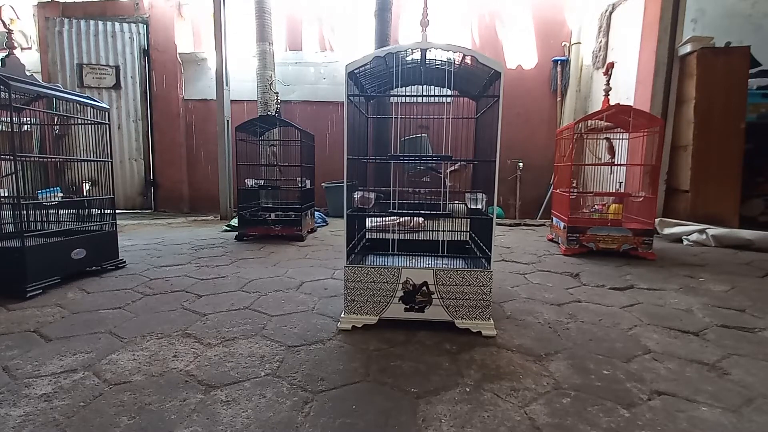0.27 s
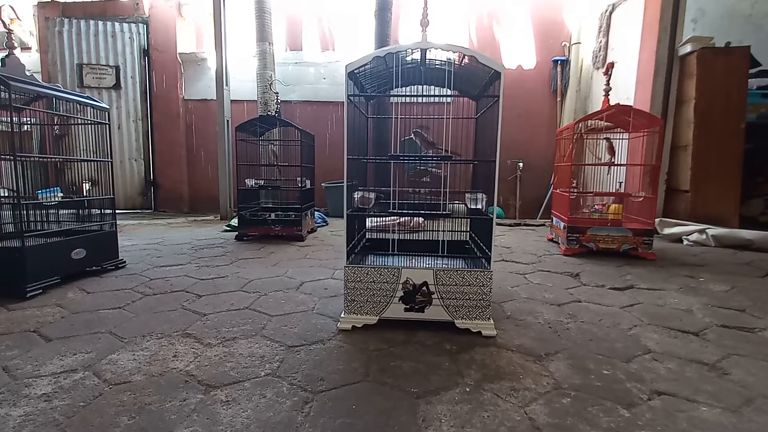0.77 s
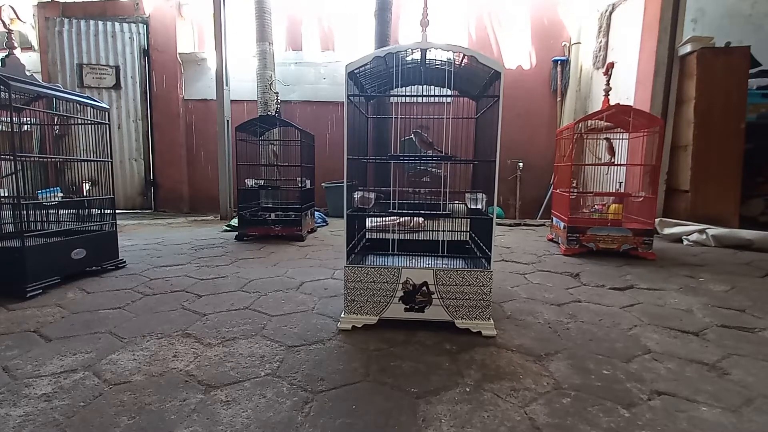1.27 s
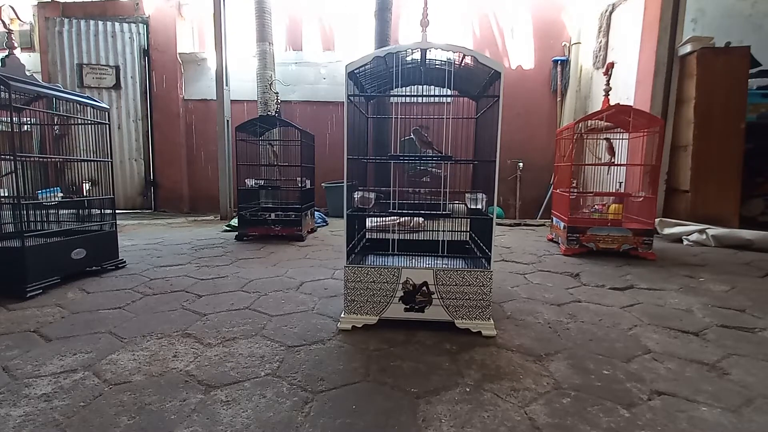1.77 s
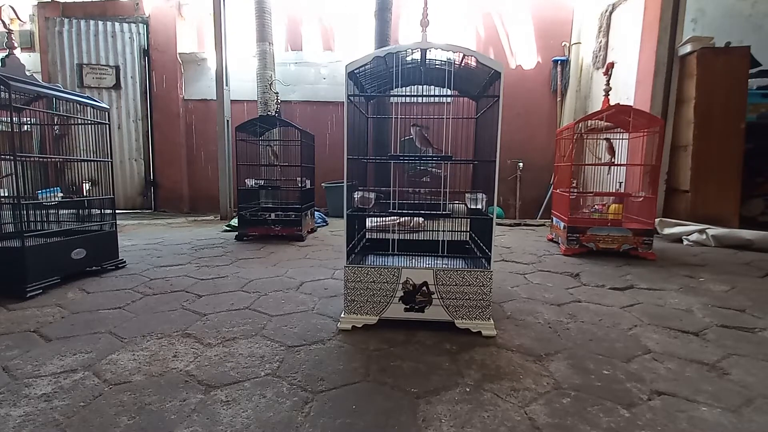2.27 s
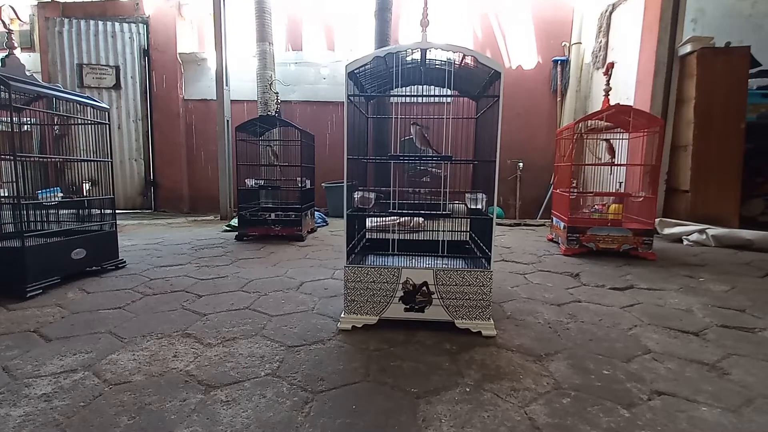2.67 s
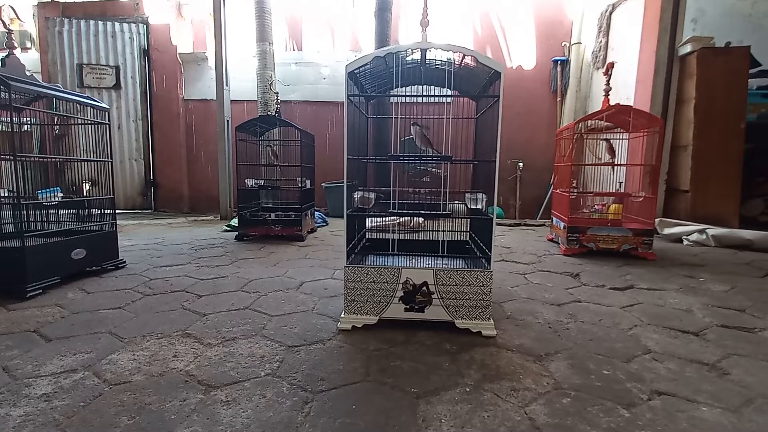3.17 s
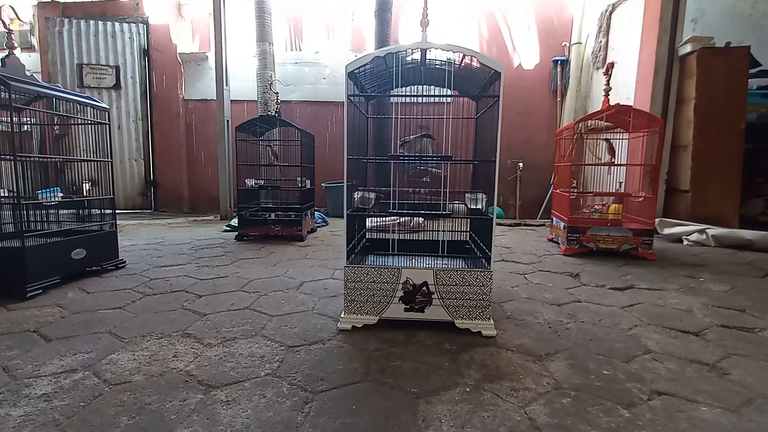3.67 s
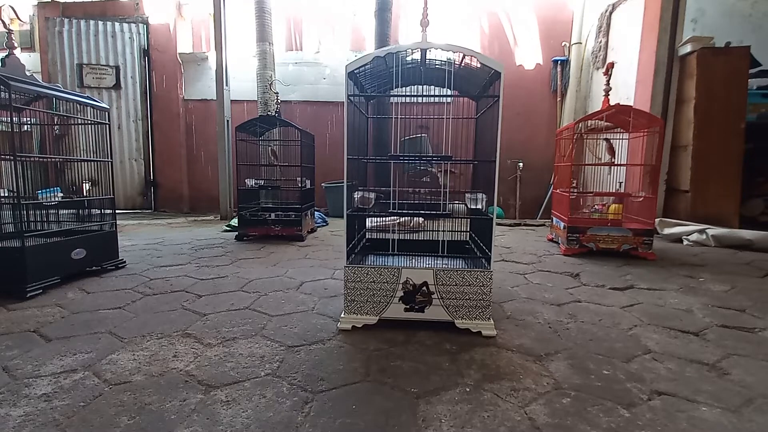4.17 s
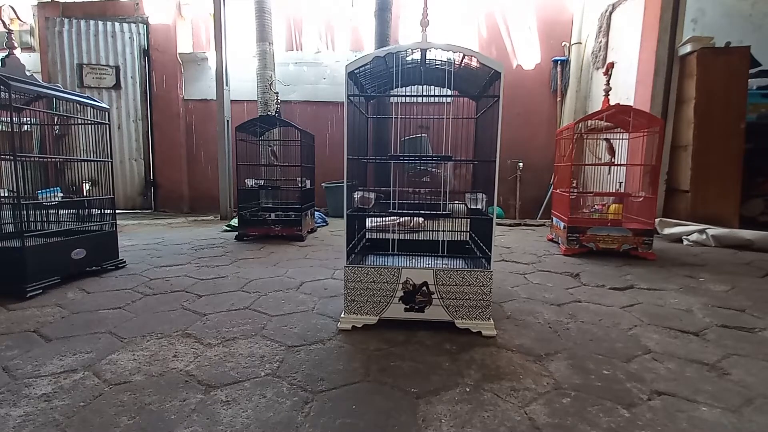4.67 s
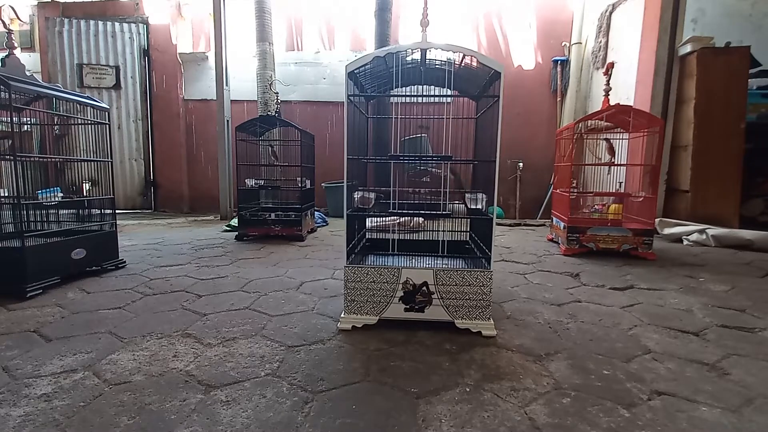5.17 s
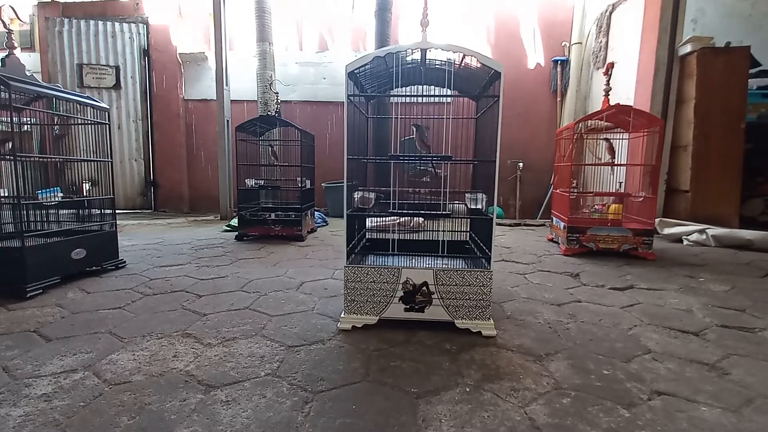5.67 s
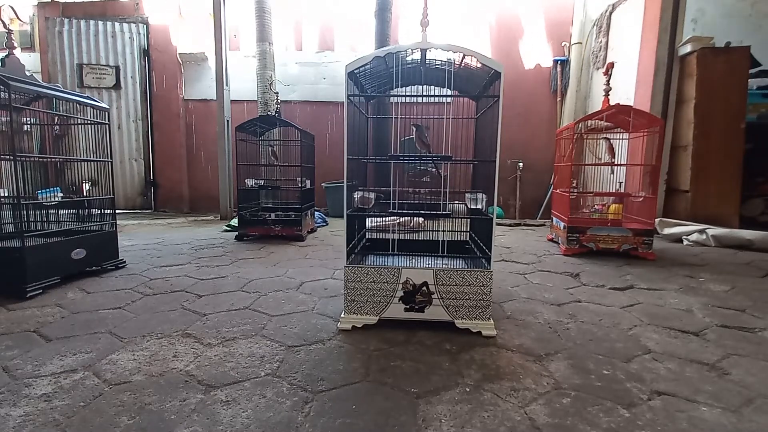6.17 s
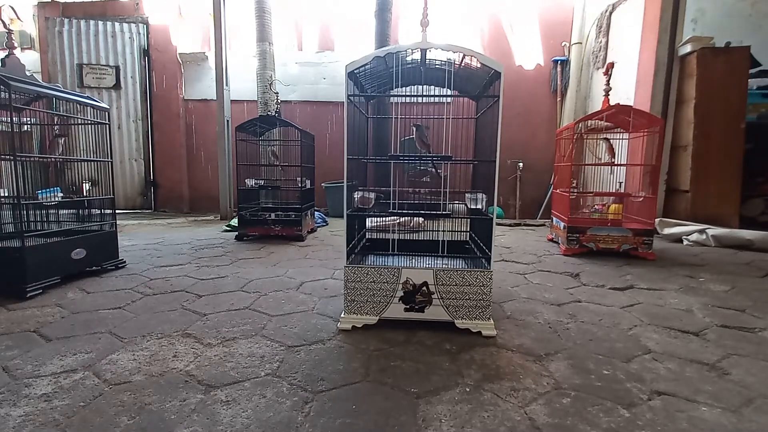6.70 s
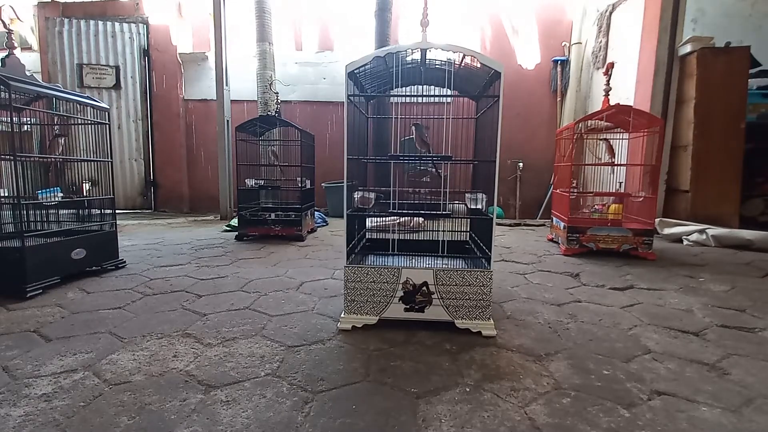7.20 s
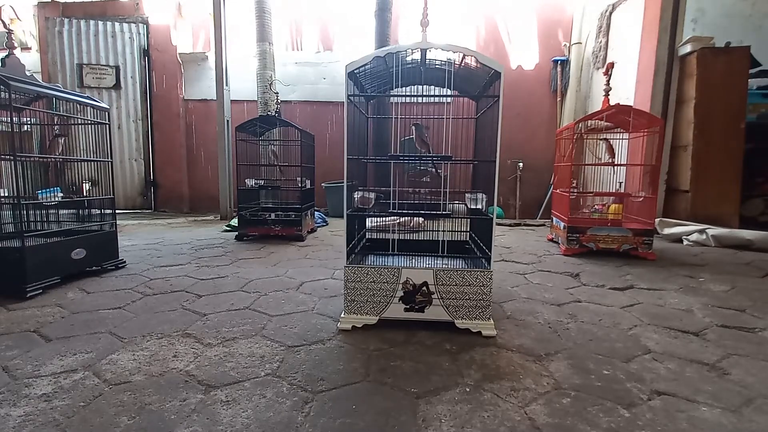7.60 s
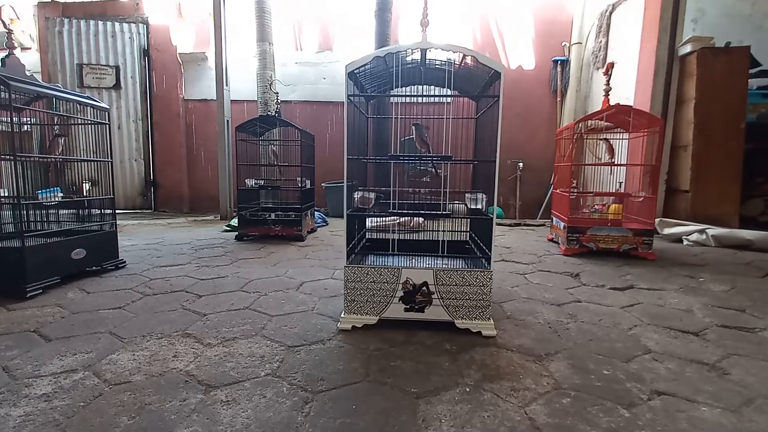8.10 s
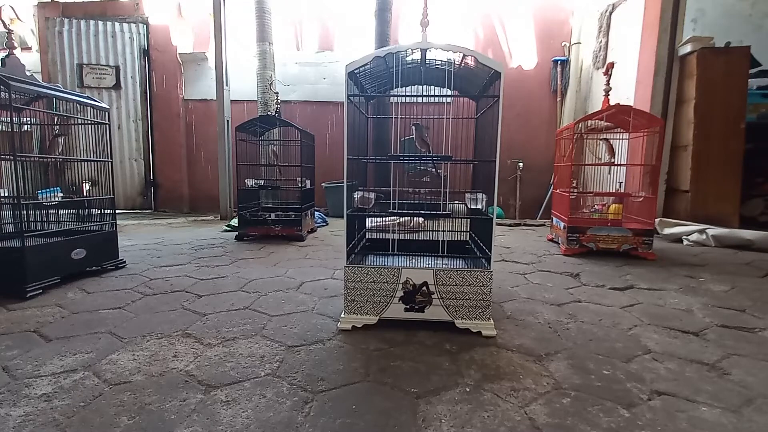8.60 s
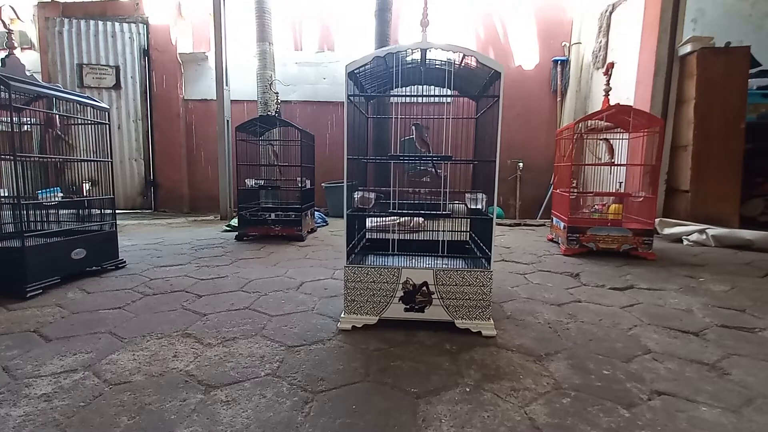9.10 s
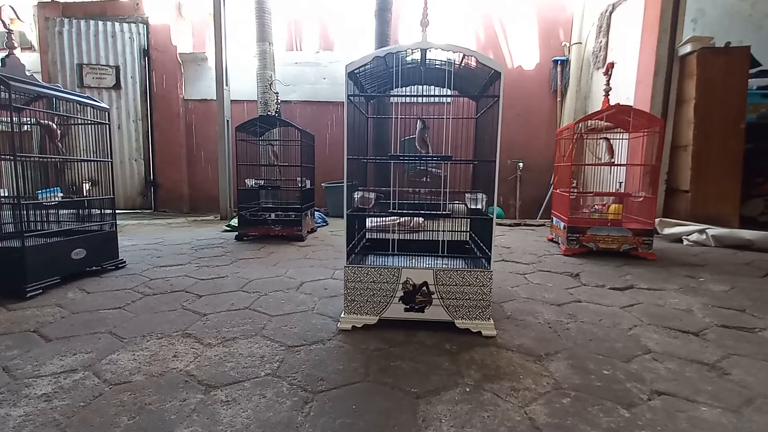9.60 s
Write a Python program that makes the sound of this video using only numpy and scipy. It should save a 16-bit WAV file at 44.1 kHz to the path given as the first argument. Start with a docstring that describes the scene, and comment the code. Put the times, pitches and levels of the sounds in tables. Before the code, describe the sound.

In a hard-walled paved yard, a caged shrike mixes thin pips, paired harsh chacks, rising nasal whines and clear whistles. A second bird repeats quick falling slurs at the beginning and again near the end. Soft bass puffs hit the microphone early, light cage scuffs come midway, and a distant engine hum grows from about six seconds.

```python
"""A hard-walled, paved yard with caged songbirds, heard at two microphone ports over a murmur of distant streets.
A shrike runs through thin pips, reedy chips, churrs, harsh chacks, nasal whines and whistles, each a sum of
partials along a pitch curve; a second bird, at another spot, repeats a falling slur made the same way.
Short noise bursts rattle a cage, bass noise puffs at the ports, and far off an engine swells: firing orders
over a noise roar. Wall echoes and a decaying tail surround the birds and the cage."""
import sys
import numpy as np
from scipy import signal
from scipy.fft import rfft, irfft, next_fast_len
from scipy.io import wavfile
from scipy.ndimage import map_coordinates

SR = 44100
rng = np.random.default_rng(int(sys.argv[2]) if len(sys.argv) > 2 else 0)


def wrap_up_sound(samples):
    """Save the sound to the file named by the first command line argument, as 16-bit audio."""
    columns = np.atleast_2d(samples).T
    # keep every value between -1 and 1, then stretch to whole-number steps
    tamed = np.clip(columns, -1, 1)
    steps = np.round(tamed * 32767).astype(np.int16)
    wavfile.write(sys.argv[1], SR, steps)


N = 434385  # length in samples


def amp(db):
    """Amplitude factor of a level in dB."""
    return 10 ** (np.asarray(db) / 20)


def unit(x):
    """Scale to an rms of 1."""
    return x / np.sqrt(np.mean(x ** 2) + 1e-20)


def along(points, hz):
    """Read (f/Hz, value) points on a log frequency axis."""
    f, v = np.transpose(points)
    return np.interp(np.log(hz + 1), np.log(f + 1), v)


def curves(rows):
    """One value per sample for each column after the time."""
    s, *columns = np.transpose(rows)
    return [np.interp(np.arange(N) / SR, s, column) for column in columns]


def wobble(rate, size=N):
    """A smooth random curve with rate knots a second."""
    knots = rng.standard_normal(int(size * rate / SR) + 4)
    return map_coordinates(knots, [np.arange(size) * rate / SR])


def filtered(x, response):
    """Shape x by a complex response of frequency."""
    m = next_fast_len(N + 8192)
    return irfft(rfft(x, m) * response(np.fft.rfftfreq(m, 1 / SR)), m)[..., :N]


def add(track, s, sound):
    """Mix a sound into a track from time s on, cut at the track's ends."""
    start = round(s * SR)
    part = sound[..., max(-start, 0):max(N - start, 0)]
    track[..., max(start, 0):max(start, 0) + part.shape[-1]] += part


def steps(length, count=80):
    """Even moments through a note, in s after its start."""
    return np.linspace(0, length, count)


def noise(spectrum):
    """Two unrelated coloured noises with a joint rms of 1."""
    return unit(filtered(rng.standard_normal((2, N)), lambda hz: amp(along(spectrum, hz))))


# likeness of all-round noise at the two microphone ports: f/Hz, left-right correlation [0-1]
PORT_LIKENESS = [(50, 0.7), (130, 0.98), (300, 0.67), (600, 0.35), (1500, 0.13)]


def diffuse(spectrum):
    """Noise from all around: mostly alike at both ports in the bass, hardly alike in the treble."""
    def turn(hz):
        return np.arccos(np.clip(along(PORT_LIKENESS, hz), -1, 1)) / 2

    mid, side = filtered(noise(spectrum), lambda hz: np.array([np.cos(turn(hz)), np.sin(turn(hz))]))
    return unit(np.array([mid + side, mid - side]))


# where the treble control of the beak begins, and the span over which it sets in
TREBLE_HZ, TREBLE_WIDTH_HZ = 4000, 470


def add_note(track, rows, partials, rough, flutter_db, throat=None, treble_db=0):
    """One syrinx note along (t/s, f/Hz, level/dB) rows; rough shakes pitch, flutter level, treble_db the beak."""
    s, hz, db = np.transpose(rows)
    t = np.arange(s[0], s[-1], 1 / SR)
    pitch = np.abs(np.interp(t, s, hz) * (1 + rough * wobble(900, size=len(t))))
    phase = 2 * np.pi * np.cumsum(pitch) / SR
    effort_db = np.interp(t, s, db)
    beak_db = np.interp(t, s, treble_db + np.zeros(len(s)))
    tone = 0
    for k, level in partials:
        if throat:
            # high overtones waver, and fade first when the effort drops
            high = np.clip(np.log2(k * pitch / 3800), 0, 1)
            waver_db = .35 * (effort_db - max(db)) + 3 * wobble(45, size=len(t))
            level = level + along(throat, k * pitch) + high * waver_db
        treble = np.clip((k * pitch - TREBLE_HZ) / TREBLE_WIDTH_HZ, 0, 1)
        audible = k * pitch < SR / 2  # no aliasing
        tone = tone + amp(level + treble * beak_db) * audible * np.sin(k * phase)
    edges = np.clip(np.minimum(t - s[0], s[-1] - t) / .004, 0, 1)  # 4 ms ramps
    level_db = effort_db + flutter_db * wobble(346.3, size=len(t))
    add(track, s[0], tone * edges * amp(level_db))


def harmonics(count):
    """An even stack of partials, to be shaped by the throat."""
    return [(k + 1, 0) for k in range(count)]


# the hard walls: f/Hz, time to decay by 60 dB t/s
WALLS = [(300, 0.067), (2000, 0.59), (4000, 0.66), (6000, 0.6), (9000, 0.66), (14000, 0.25)]


def in_yard(x, lag_ms, pan_db, direct_db, wet_db, early_db):
    """Direct sound at two ports, 8 wall echoes a port and the yard's dense tail; lag delays left, pan favours it."""
    direct = filtered(x, lambda hz: np.exp(np.pi * 1j * np.outer([-1, 1], hz) * lag_ms / 1000))
    direct_gain = amp(direct_db + np.array([[pan_db], [-pan_db]]) / 2)
    # tail: noise that decays at its own rate in each band
    hz, t, z = signal.stft(rng.standard_normal((2, SR)), SR, nperseg=256)
    decay = amp(-60 * t / along(WALLS, hz)[:, None]) * (1 - np.exp(-t / 0.0014))
    tail = signal.istft(z * decay, SR, nperseg=256)[1]
    tail *= amp(wet_db) / np.linalg.norm(tail[0])
    for port in tail:
        echoes = (rng.uniform(.004, .035, size=8) * SR).astype(int)
        port[echoes] += amp(early_db) * rng.choice([-1, 1], size=8)
    return direct * direct_gain + signal.fftconvolve(x[None], tail, axes=1)[:, :N]


# background of the yard over time: t/s, level/dB
YARD_LEVEL = [(0, -65.5), (2.6, -71), (3.3, -68), (4.8, -63.5), (5.6, -67), (6.2, -64.5)]
# colour of the background: f/Hz, relative level/dB
STREET_COLOUR = [(25, -33), (60, -4), (110, 1.5), (180, -2.5), (300, -12), (600, -19), (1200, -27.5),
                 (4000, -23), (10000, -43), (15000, -24)]


def background():
    """The low murmur of distant streets: coloured noise from all around."""
    level_db, = curves(YARD_LEVEL)
    return amp(level_db) * diffuse(STREET_COLOUR)


# loudness of the far engine before its arrival fade: t/s, relative level/dB
ENGINE_LEVEL = [(6.3, -91), (6.48, -56), (6.96, -55), (7.22, -59), (7.76, -50), (7.82, -55), (8.08, -48.5),
                (8.17, -52), (8.35, -42.5), (8.75, -50), (9.85, -53.5)]
# firing orders: multiple of the firing rate, relative level/dB
EXHAUST_ORDERS = [(0.997, -18), (1.5, -19), (2, -2.5), (2.5, -6.5), (3, 0.5), (3.5, -20), (4, -8.5),
                  (6, -13.5), (7.5, -19.5), (8.25, -21)]
# colour of the exhaust roar: f/Hz, relative level/dB
ROAR_COLOUR = [(25, -80), (45, -11), (120, 0), (180, -5), (270, -14.5), (400, -18), (700, -26.5),
               (1200, -31), (2500, -26), (6000, -120)]
# gear tones that join under load: f/Hz, mean level/dB
GEAR_TONES = [(46, -54), (338, -65), (758, -67)]
ENGINE_HZ, ENGINE_DRIFT = 39.93, 0.0074  # firing rate, and the share by which it wanders
# when it comes into earshot and when it takes load, each with its rise time
ARRIVES_S, ARRIVAL_S, PULLS_S, PULL_RISE_S = 6.1, 1, 9.1, 0.14
THROB_DB, ROAR_DB, ROAR_GROWS_DB_PER_S = -0.5, -10, 3.5  # roar level as it arrives


def engine():
    """A far engine: unsteady firing orders over a dull exhaust roar that grows; gear tones join as it pulls."""
    loud_db, = curves(ENGINE_LEVEL)
    t = np.arange(N) / SR
    phase = 2 * np.pi * np.cumsum(ENGINE_HZ * (1 + ENGINE_DRIFT * wobble(9.5))) / SR
    throb = np.zeros(N)
    for k, db in EXHAUST_ORDERS:
        throb += amp(db + 2.5 * wobble(4)) * np.sin(k * phase + .4 * wobble(5))
    gears = np.zeros(N)
    for hz, db in GEAR_TONES:
        shake = hz / 380 * (wobble(14) + .6 * wobble(70))  # radians
        gears += amp(db + 3 * wobble(9)) * np.sin(2 * np.pi * hz * t + shake)
    roar = amp(ROAR_DB + ROAR_GROWS_DB_PER_S * (t - ARRIVES_S)) * diffuse(ROAR_COLOUR)
    arrival = np.clip((t - ARRIVES_S) / ARRIVAL_S, 0, 1)
    load = np.clip((t - PULLS_S) / PULL_RISE_S, 0, 1)
    return arrival * amp(loud_db) * (amp(THROB_DB) * unit(throb) + roar) + load * gears


# puffs of air at the microphone: t/s, length t/s, left port level/dB, right port level/dB
AIR_PUFFS = [(0.026, 0.12, -49, -52), (0.114, 0.21, -56, -46), (0.542, 0.12, -70, -46.5),
             (0.662, 0.16, -62, -50), (0.77, 0.21, -61, -42.5), (1.279, 0.082, -43.5, -75),
             (1.585, 0.14, -48.5, -72), (1.829, 0.046, -34, -62), (1.845, 0.16, -34.5, -72),
             (2.02, 0.16, -54, -50.5)]
# colour of the buffeting: f/Hz, relative level/dB
BUFFET_COLOUR = [(20, -33), (40, -11), (75, -2.5), (130, -17.5), (280, -35), (600, -63.5)]


def puffs():
    """Each eddy pushes on the two ports with its own strength: swelling and fading bass noise."""
    strength = np.zeros((2, N))
    for s, length, left_db, right_db in AIR_PUFFS:
        add(strength, s, amp([[left_db], [right_db]]) * np.hanning(int(length * SR)))
    return strength * noise(BUFFET_COLOUR)


# cage taps, and a sharp bill snap at 6.215 s: t/s, relative level/dB, share of bright noise against frame [0-1]
CAGE_TAPS = [(4.423, -48.5, 0.21), (4.488, -57.5, 0.14), (4.663, -54, 0.2), (4.788, -55.5, 0.21),
             (5.243, -61, .1), (6.215, -61, 0.96)]
# colour of the wooden frame: f/Hz, relative level/dB
FRAME_COLOUR = [(100, 5), (300, -0.5), (800, -7), (1600, -6), (4000, 10), (15000, -37)]
# colour of claws on wire and of a snapping bill: f/Hz, relative level/dB
WIRE_COLOUR = [(2000, -40), (5000, -9), (9000, -15), (13000, 1), (15500, -7)]


def cage():
    """Light scuffs of feet: a knock in the frame and a scratch on the wires; one bright burst is a bill snap.
    All are decaying noise."""
    frame, wire, t = np.zeros(N), np.zeros(N), np.arange(SR // 4) / SR
    for s, db, bright in CAGE_TAPS:
        decay_db = db - 60 * t / .13  # 60 dB down in 0.13 s
        scuff = amp(decay_db + 3 * wobble(300, size=len(t))) * (1 - np.exp(-t / .005))
        add(frame, s, scuff * (1 - bright))
        add(wire, s, scuff * bright)
    return amp(11.5) * (frame * noise(FRAME_COLOUR)[0] + wire * noise(WIRE_COLOUR)[0])


# falling slurs: t/s, length t/s, end f/Hz, bend [1 dives straight, 2 levels off],
# relative level/dB, fade by the end level/dB
FALLING_SLURS = [(.415, 0.17, 2654, 2.65, -34, 6), (.68, 0.18, 2743, 2.6, -31.5, 10.4),
                 (.949, 0.21, 2683, 2.58, -30, 18.4), (1.226, .16, 1690, 0.92, -29.5, 16.4),
                 (1.473, 0.15, 1688, 0.92, -30.5, 13.9), (1.736, 0.15, 1828, 0.99, -31, 12.7),
                 (1.995, .15, 1854, 0.98, -31.5, 13.8), (7.343, 0.18, 2754, 2.4, -36, 4.7),
                 (7.616, .19, 2717, 2.3, -31.5, 10.6), (7.905, 0.18, 1940, 1.1, -30, 19.3),
                 (8.177, 0.17, 1800, 0.98, -30, 14.8), (8.436, .15, 1930, 1.03, -26.5, 20.4),
                 (8.695, 0.16, 1720, 0.89, -29, 16.8), (8.949, 0.15, 1795, 0.83, -31, 13)]
# the slurring bird's beak: f/Hz, gain level/dB
SLUR_BEAK = [(1800, 0), (2700, 1.5), (3800, 6), (4800, 10.5), (6000, -7), (7500, 5), (9500, -17),
             (12000, 6), (14500, -13)]
# shared start; opening deficit and its time constant; share of the length before the fade
SLUR_START_HZ, SLUR_OPENING_DB, SLUR_ATTACK_S, SLUR_HOLD = 4550, 21.5, 0.02, 0.14


def slurring_bird():
    """Nearly pure glides that start alike, then level off and hold, or dive and fade."""
    song = np.zeros(N)
    for s, length, end_hz, bend, db, fade_db in FALLING_SLURS:
        t = steps(length)
        u = t / length
        hz = end_hz + (SLUR_START_HZ - end_hz) * np.abs(1 - u) ** bend
        opening_db = SLUR_OPENING_DB * np.exp(-t / SLUR_ATTACK_S)
        closing_db = fade_db * np.interp(u, [SLUR_HOLD, 1], [0, 1]) ** 1.03
        rows = np.transpose([s + t, hz, db - opening_db - closing_db])
        partials = [(1, .5), (2, -21.5), (3, -23)]  # multiple, level/dB
        add_note(song, rows, partials, rough=0.0049, flutter_db=1.5, throat=SLUR_BEAK)
    return song


STEADY_DB = .9  # level flutter of whines and whistles
# short clear whistles: t/s, length t/s, reference f/Hz, opening arch f/Hz, relative level/dB
CLEAR_WHISTLES = [(3.46, 0.15, 4406, 877, -29.5), (5.4, 0.032, 2837, 8, -35),
                  (7.691, 0.14, 4385, 780.5, -29), (9.474, 0.046, 4950, 178, -32.5),
                  (9.76, .04, 4300, 35, -36), (9.818, .07, 4750, 5, -24)]
# partials of a whistle: multiple of the reference, relative level/dB
FLUTY_PARTIALS = [(2 / 3, -17), (0.97, 0), (4 / 3, -30), (5 / 3, -20.5), (2, -34.5), (8 / 3, -26)]
WHISTLE_TREMOR = .004  # share of the pitch
ARCH_PEAK_S, ARCH_WIDTH_S = 0.032, .033  # when the arch tops out, and how fast it settles
WHISTLE_SCOOP, WHISTLE_SCOOP_S = 0.089, 0.00527  # starts flat by this share; recovery time constant
WHISTLE_ATTACK_S, WHISTLE_RELEASE_S, WHISTLE_FADE_DB = 0.024, 0.013, 12


def whistles():
    """A short, nearly pure note scoops in, may arch above its pitch, then settles."""
    song = np.zeros(N)
    for s, length, held_hz, arch_hz, db in CLEAR_WHISTLES:
        t = steps(length)
        scoop = 1 - WHISTLE_SCOOP * np.exp(-t / WHISTLE_SCOOP_S)
        hz = held_hz * scoop + arch_hz * np.exp(-((t - ARCH_PEAK_S) / ARCH_WIDTH_S) ** 2)
        opening = np.clip(np.minimum(t / WHISTLE_ATTACK_S, (length - t) / WHISTLE_RELEASE_S), 0, 1)
        rows = np.transpose([s + t, hz, db - WHISTLE_FADE_DB * (1 - opening)])
        add_note(song, rows, FLUTY_PARTIALS, WHISTLE_TREMOR, STEADY_DB)
    return song


# rising nasal whines: t/s, length t/s, opening f/Hz, top f/Hz, share of the climb at an even pace,
# lateness of the rest, relative level/dB, gain by the end level/dB, depth of the swells, treble level/dB
NASAL_WHINES = [(3.114, 0.36, 1485, 2416, 0.072, 2.02, -29, -2.5, 0.98, 1),
                (4.569, 0.089, 1493, 1790, 0.45, 1.4, -52, 7.5, 0.18, 0),
                (5.276, 0.16, 1606, 2009, 0.38, 0.87, -42.5, 1.5, 0.1, -2),
                (6.839, .365, 1424, 2417, 0.43, 2.7, -33.5, -4, 1, -2),
                (8.272, .33, 1439, 2435, 0.22, 2.6, -35, -9, 0.61, 4.5),
                (9.25, 0.34, 1459, 2385, 0.46, 3.2, -33, 1, 0.75, 0)]
# swells and beak through a whine, before depth: share of its length, effort level/dB, treble level/dB
WHINE_COURSE = [(0, -11.5, 10.5), (.06, -7, 10), (.13, -2, 2), (.23, -2, -19), (.42, -9.5, -14.5),
                (.6, -1, -18), (.78, 2.5, 1), (.92, -0.5, -11.5), (1.002, 5.5, -12)]
# the throat's resonances: f/Hz, gain level/dB
NASAL_THROAT = [(1300, -16), (1950, -16), (2400, 2), (3000, 4), (3600, -3), (4300, 4), (4800, -1),
                (6300, -13.5), (7400, -11.5), (8200, -20), (9000, -17.5), (10300, -32), (12000, -16.5),
                (15500, -29)]
# softly sung whines turn hoarse: level/dB, roughness [share of pitch]
HOARSENESS = [(-52, .05), (-44, .028), (-36, .005), (-26, .002)]
WHINE_SCOOP, WHINE_SCOOP_S = 0.18, .013  # starts flat by this share; recovery time constant
WHINE_TOPS_OUT = .91  # share of the length at which the top is reached


def whines():
    """A nasal note scoops up to its opening pitch, creeps higher, then climbs in an S to the top and holds it."""
    song = np.zeros(N)
    share, effort_db, beak_db = np.transpose(WHINE_COURSE)
    for s, length, open_hz, top_hz, creep, late, db, gain_db, depth, bright_db in NASAL_WHINES:
        t = steps(length)
        u = t / length
        way = np.clip(u / WHINE_TOPS_OUT, 0, 1)
        climb = creep * way + (1 - creep) * np.sin(np.pi / 2 * way ** late) ** 2
        scoop = 1 - WHINE_SCOOP * np.exp(-t / WHINE_SCOOP_S)
        hz = open_hz * scoop + (top_hz - open_hz) * climb
        level_db = db + gain_db * u + depth * np.interp(u, share, effort_db)
        treble_db = bright_db + depth * np.interp(u, share, beak_db)
        rough = np.interp(db, *np.transpose(HOARSENESS))
        add_note(song, np.transpose([s + t, hz, level_db]), harmonics(count=10), rough, STEADY_DB,
                 throat=NASAL_THROAT, treble_db=treble_db)
    return song


# thin high pips: t/s, reference f/Hz, relative level/dB
THIN_PIPS = [(-.035, 6800, -28.5), (0.384, 6450, -41.5), (1.125, 6670, -50), (1.918, 6710, -47),
             (2.727, 6750, -46), (3.999, 6420, -39), (4.151, 6485, -35), (5.597, 6263, -33.5),
             (6.401, 6650, -42.5), (9.546, 6620, -38.5)]
# course of a pip: t/s after its start, share of the reference, relative level/dB
PIP_COURSE = [(0, 0.71, -22.5), (.016, 0.88, -10.5), (.025, 0.85, 3), (.036, 0.98, -4.5), (.05, 0.76, -12)]
# partials of a pip: multiple, relative level/dB
PIP_PARTIALS = [(0.532, -17), (0.998, 3), (1.178, -12.5), (1.9, -12.5)]
# reedy chips: t/s, reference f/Hz, relative level/dB
REEDY_CHIPS = [(0.096, 5526, -35.5), (4.289, 5572, -33.5)]
# course of a chip: t/s after its start, share of the reference, relative level/dB
CHIP_COURSE = [(0, 0.61, -19), (.016, 0.98, -4), (.028, 0.9, 0), (.04, 0.84, 8.5), (.053, 0.82, -20)]
# partials of a chip: multiple, relative level/dB
REEDY_PARTIALS = [(2 / 3, -16.5), (0.97, 0), (4 / 3, -30), (5 / 3, -26), (2.4, -28), (8 / 3, -29)]
# gruff falling churrs: t/s, length t/s, start f/Hz, relative level/dB, roughness [share of pitch]
FALLING_CHURRS = [(2.434, 0.037, 4520, -47, 0.032), (4.44, 0.047, 4610, -53, 0.075),
                  (4.713, 0.079, 4710, -41, 0.141), (4.792, 0.051, 4070, -46.5, 0.102),
                  (4.917, 0.061, 5320, -42, 0.043), (4.997, 0.046, 5870, -34, 0.018),
                  (5.122, 0.061, 4750, -46.5, 0.069)]
# partials of a churr: multiple, relative level/dB
GRUFF_PARTIALS = [(0.5, -15.5), (0.748, -6), (1, 1.5), (1.251, -10), (1.5, -18), (2.002, -25), (2.499, -28)]
# harsh chacks: t/s, top f/Hz, relative level/dB
HARSH_CHACKS = [(0.532, 3240, -34.5), (0.696, 2990, -33.5), (1.286, 2990, -36.5), (1.455, 2860, -33),
                (2.079, 3174, -32.5), (2.232, 2943, -33.5), (2.888, 2934, -36.5), (3.052, 2960, -35.5),
                (3.685, 2950, -46), (5.734, 3120, -32), (5.902, 2940, -31.5), (6.098, 2400, -44),
                (6.55, 3080, -33), (6.714, 2720, -34), (7.169, 3025, -32.5), (7.311, 2847, -31.5),
                (7.485, 2807, -38), (7.913, 2900, -41.5)]
# course of a chack: t/s after its start, share of the top, relative level/dB
CHACK_COURSE = [(0, .66, -11.5), (.01, .75, -12.5), (.02, .88, -8.5), (.027, 1, -3.5), (.036, .82, -5),
                (.05, 0.48, -17.5)]
# partials of a chack: multiple, relative level/dB
HARSH_PARTIALS = [(1, -2.5), (1.5, -9), (2, 2), (2.5, -9), (3, -1.5), (4, -5.5), (5, -2)]
# the wide open beak of a chack: f/Hz, gain level/dB
OPEN_BEAK = [(1200, -72), (2000, -13.5), (2800, 0), (4500, 3.5), (5800, -2.5), (6800, -7.5), (9000, -14),
             (10500, -26), (12500, -5), (16000, -45)]


def shrike():
    """Pips, reedy chips, nasal whines and whistles, with churrs and chacks roughened by random pitch shake."""
    song = np.zeros(N)

    def course(shape, s, hz, db):
        return [(s + after, hz * share, db + level) for after, share, level in shape]

    for s, hz, db in THIN_PIPS:
        add_note(song, course(PIP_COURSE, s, hz, db), PIP_PARTIALS, rough=.034, flutter_db=2)
    for s, hz, db in REEDY_CHIPS:
        add_note(song, course(CHIP_COURSE, s, hz, db), REEDY_PARTIALS, rough=0.025, flutter_db=2.5)
    for s, length, hz, db, rough in FALLING_CHURRS:
        fall = [(s, hz, db - 3), (s + .35 * length, .84 * hz, db), (s + length, .72 * hz, db - 7)]
        add_note(song, fall, GRUFF_PARTIALS, rough, flutter_db=2.5)
    for s, hz, db in HARSH_CHACKS:
        rows = course(CHACK_COURSE, s, hz, db)
        add_note(song, rows, HARSH_PARTIALS, rough=.08, flutter_db=2, throat=OPEN_BEAK)
    return song + whines() + whistles()


def scene():
    """Two birds at different spots in the yard, over the puffs, the engine and the streets."""
    around = background() + engine() + puffs()
    second_spot = in_yard(slurring_bird(), lag_ms=-.16, pan_db=6.0, direct_db=-2.5, wet_db=-2.5, early_db=-15.5)
    cage_spot = in_yard(cage() + shrike(), lag_ms=0.213, pan_db=-.6, direct_db=-2.0, wet_db=-2.5, early_db=-15.5)
    return around + second_spot + cage_spot


TOP_HZ = 15800  # band limit of the microphone chain


def record(dry):
    """The microphone chain passes only what lies below its band limit."""
    return filtered(dry, lambda hz: hz < TOP_HZ)


dry = scene()
out = record(dry)
wrap_up_sound(out)
```